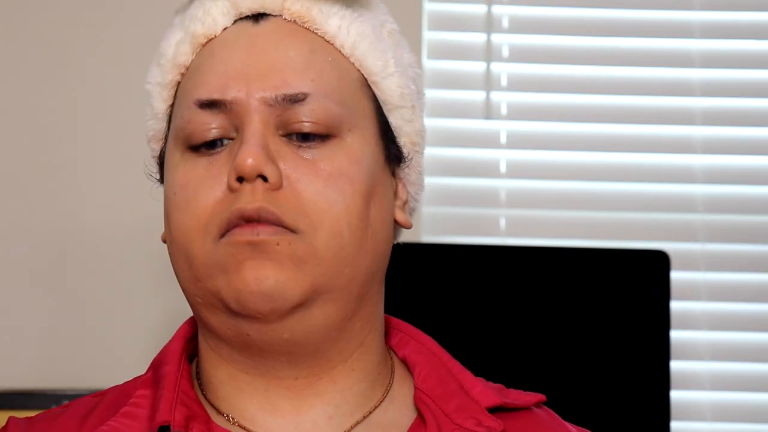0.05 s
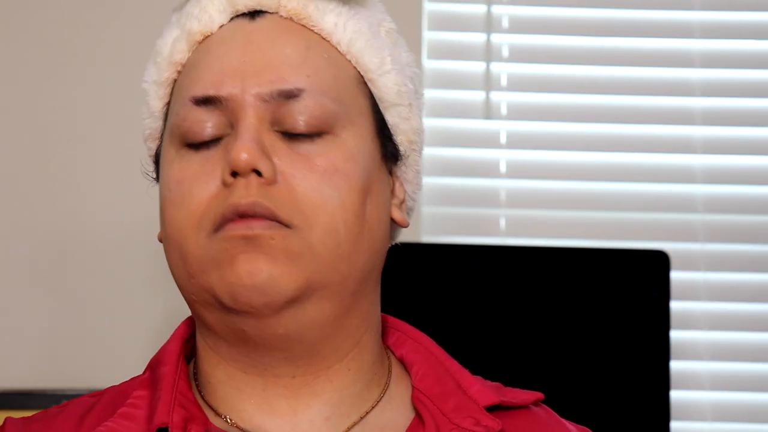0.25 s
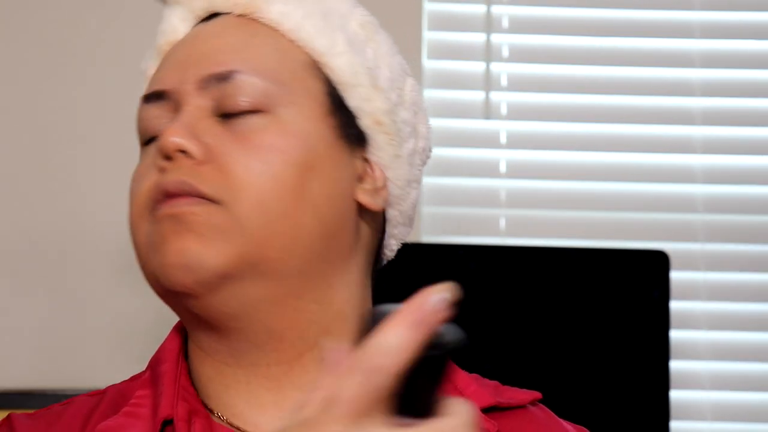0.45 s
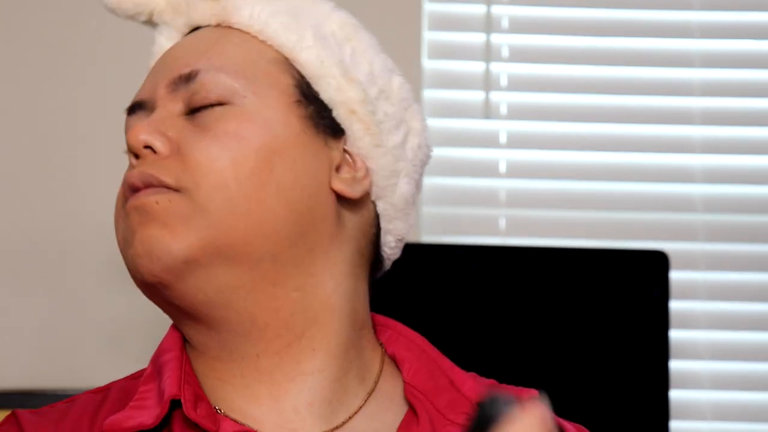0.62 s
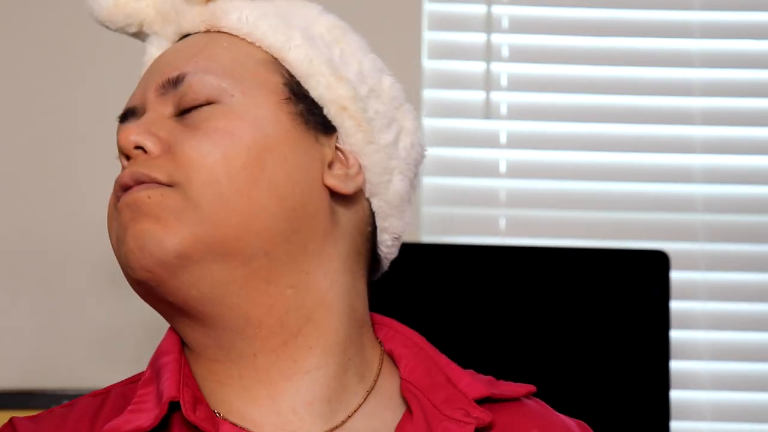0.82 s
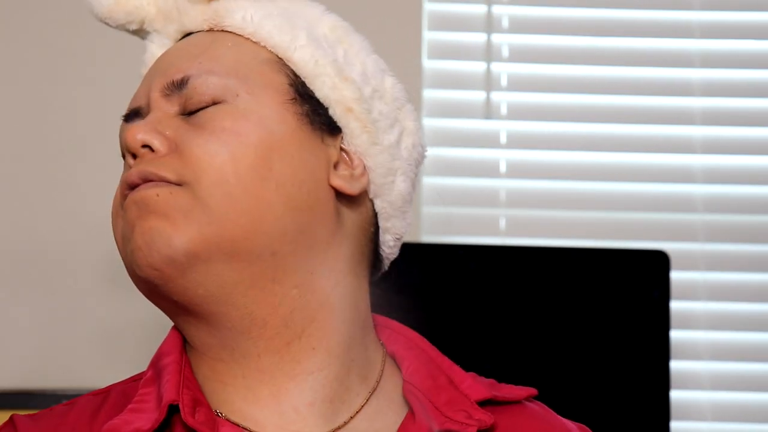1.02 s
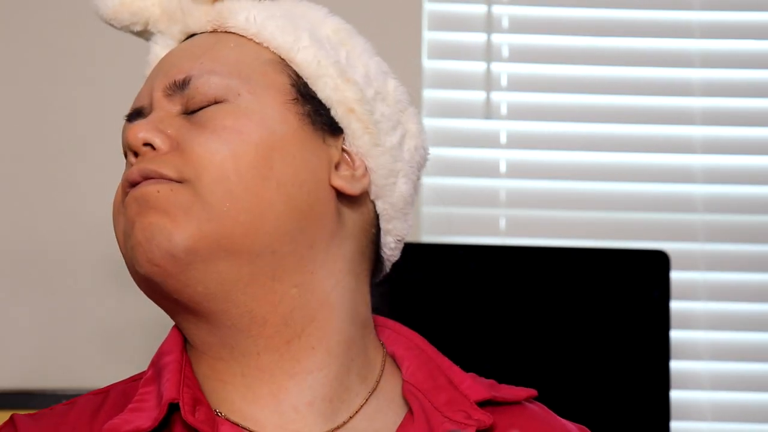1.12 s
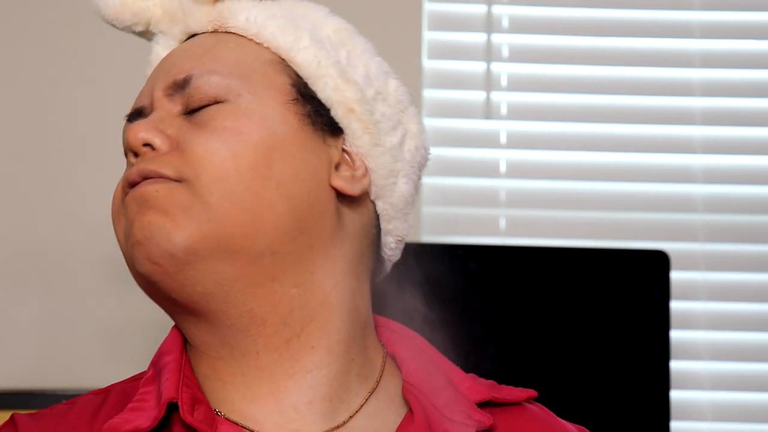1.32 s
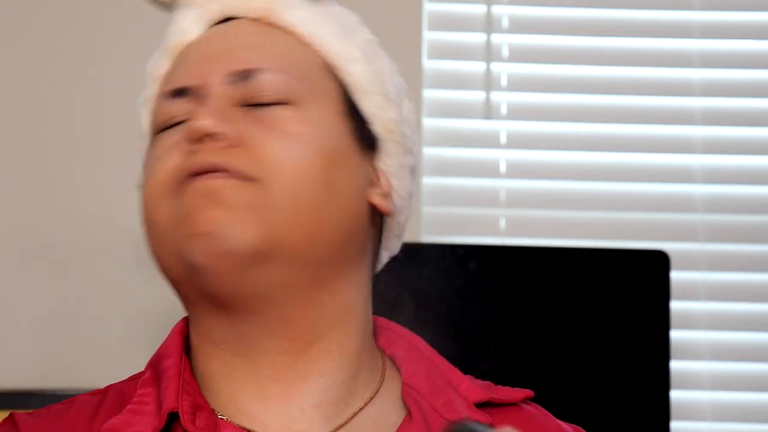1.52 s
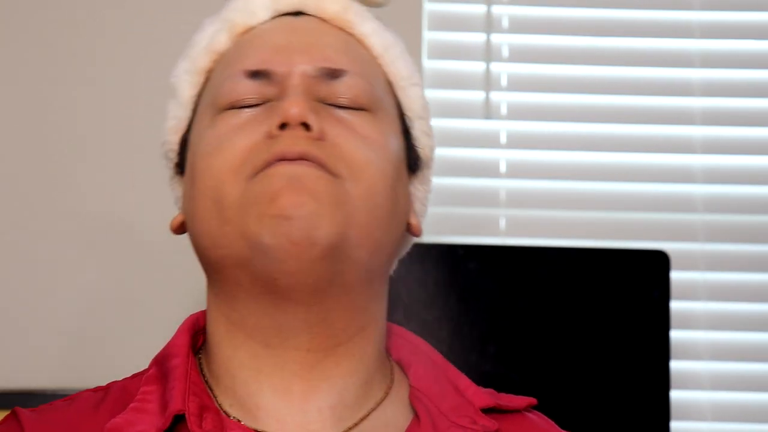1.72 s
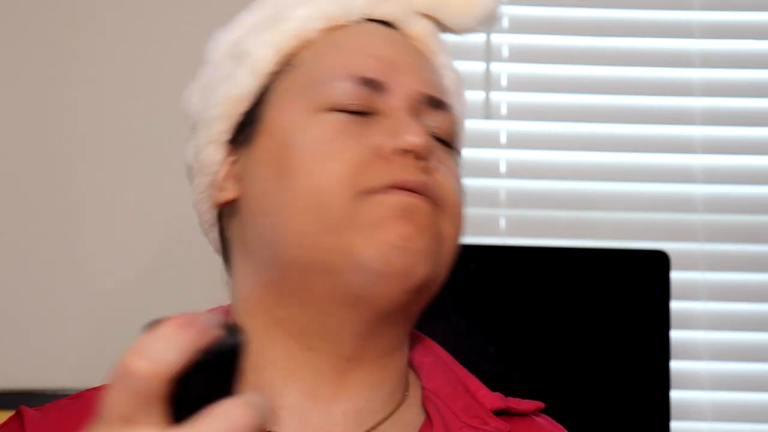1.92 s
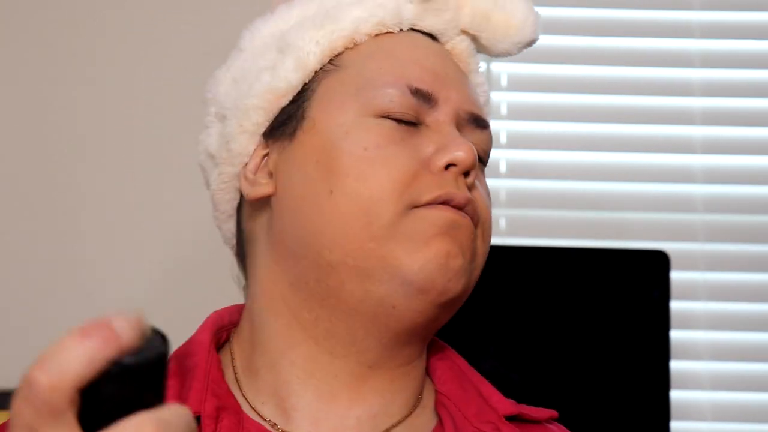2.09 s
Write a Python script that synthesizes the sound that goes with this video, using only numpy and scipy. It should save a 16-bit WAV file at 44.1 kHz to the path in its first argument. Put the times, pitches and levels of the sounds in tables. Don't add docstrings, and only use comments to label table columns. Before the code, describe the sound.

Quick spritzes from a small plastic pump bottle, with a loud cap pop first, indoors

```python
import sys
import numpy as np
from scipy import signal
from scipy.fft import rfft, irfft, next_fast_len
from scipy.io import wavfile
from scipy.ndimage import uniform_filter1d, map_coordinates

SR = 44100
rng = np.random.default_rng(int(sys.argv[2]) if len(sys.argv) > 2 else 0)


def unload_audio(sound):
    columns = np.transpose(np.atleast_2d(sound))
    steps = np.round(np.clip(columns, -1, 1) * 32767)
    wavfile.write(sys.argv[1], SR, steps.astype(np.int16))


def magnitude_from_level(level_db):
    exponent = np.asarray(level_db, float) / 20
    return 10 ** exponent


N = 94815

ROOM_DB, MIST_WET_DB = -0.5, -4.5


def unit(x):
    return x / np.sqrt(np.mean(x ** 2) + 1e-20)


def along(points, hz):
    f, v = np.transpose(points)
    return np.interp(np.log(hz + 1), np.log(f + 1), v)


def filtered(x, response):
    m = next_fast_len(x.shape[-1] + 4096)
    spectrum = rfft(x, m) * response(np.fft.rfftfreq(m, 1 / SR))
    return irfft(spectrum, m)[..., :x.shape[-1]]


def peaks(modes):
    def response(f):
        total = 0
        for k, (centre, width, db) in enumerate(modes):
            damping = 1j * f * width
            total = total + (-1) ** k * magnitude_from_level(db) * damping / (centre * centre - f * f + damping)
        return total
    return response


def wobble(rate):
    knots = rng.standard_normal(int(N * rate / SR) + 4)
    return map_coordinates(knots, [np.arange(N) * rate / SR])


def swell(t, rise, fall):
    return np.exp(-(t / np.where(t < 0, rise, fall)) ** 2)


def cycles(hz, t):
    turn = np.cumsum(hz) / SR
    return turn - np.interp(0, t, turn)


def spread(pair, spectrum, alike):
    def mix(hz):
        angle = np.arccos(np.clip(along(alike, hz), -1, 1)) / 2
        return magnitude_from_level(along(spectrum, hz)) * [np.cos(angle), np.sin(angle)]
    mid, side = filtered(pair, mix)
    return unit(np.array([mid + side, mid - side]))


def heard(x, wet_db):
    # (delay [s], left [dB], right [dB], dull above [Hz])
    reflections = [(.0046, -8, -8, 1800), (.0066, -9.5, -8.5, 30000), (.012, -20, -18, 5000),
                   (.017, -19, -21, 5000), (.024, -20, -20, 5000)]
    # (frequency [Hz], T60 [s])
    decay_times = [(300, 0.36), (1000, 0.26), (3000, 0.31), (8000, 0.4), (15000, 0.37)]
    lag_s, lag_fades_hz, right_db = 4.5e-5, 6000, 1.1

    hz, t, z = signal.stft(rng.standard_normal((2, SR // 2)), SR, nperseg=256)
    decay = magnitude_from_level(-60 * t / along(decay_times, hz)[:, None])
    tail = signal.istft(z * decay, SR, nperseg=256)[1]
    tail += filtered(tail[::-1], lambda f: 0.45 / (1 + (f / 2500) ** 2))
    build_up = np.clip(np.arange(tail.shape[1]) / SR / 0.0061, 0, 1)
    tail *= magnitude_from_level(wet_db) / np.linalg.norm(tail[0]) * build_up

    def near_field(f):
        lag = np.array([[lag_s], [0]]) / np.hypot(1, f / lag_fades_hz)
        paths = magnitude_from_level([[-right_db / 2], [right_db / 2]])
        for delay, left_db, right_echo_db, dull_hz in reflections:
            absorbed = np.exp(-2j * np.pi * f * delay) / (1 + 1j * f / dull_hz) ** 2
            paths = paths + magnitude_from_level([[left_db], [right_echo_db]]) * absorbed
        return np.exp(-2j * np.pi * f * lag) * paths

    x = np.pad(x, (0, tail.shape[1]))
    return filtered(x, near_field) + signal.fftconvolve(x[None], tail, axes=1)[:, :len(x)]


def add(out, x, s):
    out[:, round(s * SR):][:, :x.shape[1]] += x


def knocks(out):
    # (time [s], peak [dB], thud pitch [Hz], crack over thud [dB])
    press_knocks = [
        (.6142, -37.5, 1070, -23),
        (0.722, -36, 1600, -4),
        (0.915, -31, 1000, -5),
        (1.5356, -44, 900, -1),
        (1.8271, -32.5, 890, -4),
        (1.931, -35, 694, -23),
        (0.918, -17, 800, -7.5),
        (1.2002, -15.5, 916, -6),
        (1.5446, -15, 864, -12),
        (1.8343, -16.5, 815, -15),
    ]
    bottom_knocks = [
        (.9478, -16.5, 704, -11.5),
        (1.2376, -20.5, 674, -6),
        (1.5798, -19, 694, -21),
        (1.869, -20.5, 700, -8.5),
    ]
    release_knocks = [
        (0.6893, -28, 645, -15.5),
        (0.7525, -24, 686, -10),
        (1.0048, -20.5, 756, -0.5),
        (1.3121, -28.5, 700, -11),
        (1.3158, -23.5, 640, 1.5),
        (1.6293, -23.5, 600, 1.5),
        (1.9487, -21.5, 544, 1),
    ]
    # (rise [s], fall [s], pitch excess at the strike [ratio], hollow note [dB])
    knock_kinds = [
        (0.00044, 0.00079, 0.14, -26),
        (.0011, 0.0017, 0.023, -18.5),
        (.00045, 0.002, 1, -6.5),
    ]
    # (frequency [Hz], width [Hz], level [dB])
    shell_modes = [(1620, 1300, -30), (1940, 170, -26), (2720, 1550, 18.5), (4640, 280, -26),
                   (7200, 2200, 15), (9300, 650, 13.5), (11700, 6300, -32)]
    glide_s = 0.00019
    hollow_hz, hollow_t60_s, sag_per_s = 640, 0.027, 0.55
    crack_t60_s, crack_db, crack_rough = .004, 6, .25

    t = np.arange(SR // 10) / SR - .005
    shell = peaks(shell_modes)
    for rows, kind in zip((press_knocks, bottom_knocks, release_knocks), knock_kinds):
        rise, fall, excess, hollow_db = kind
        for s, db, hz, crack_over_db in rows:
            pitch = hz * (1 + 2 * excess / (1 + np.exp(t / glide_s)))
            thud = np.sin(2 * np.pi * cycles(pitch, t)) * swell(t, rise, fall)
            hollow = np.sin(2 * np.pi * hollow_hz * (t - sag_per_s * t * t)) * (t > 0)
            hollow *= magnitude_from_level(hollow_db - 60 * t / hollow_t60_s)
            contact = magnitude_from_level(-60 * (t + rise) / crack_t60_s) * (t > -rise)
            blow = crack_rough * rng.standard_normal(len(t)) * contact
            blow[np.argmax(t > -rise)] = -1
            crack = filtered(blow, lambda f: shell(f) / (1 + 1j * f / 11000) ** 2)
            crack *= magnitude_from_level(crack_over_db + crack_db) / abs(crack).max()
            add(out, heard(magnitude_from_level(db) * (thud + hollow + crack), ROOM_DB), s + t[0])


def spits(out):
    # (time [s], peak [dB])
    spit_times = [
        (.8928, -34),
        (.937, -32),
        (1.1774, -25),
        (1.19, -29),
        (1.2435, -27),
        (1.3335, -25),
        (1.352, -28),
        (1.8775, -25),
        (2.0105, -28),
        (2.0445, -28),
    ]
    # (frequency [Hz], width [Hz], level [dB])
    nozzle_modes = [(4000, 1500, -11), (7000, 1500, 0), (11000, 3000, -16)]
    t60_s = 0.0037

    t = np.arange(SR // 10) / SR - .005
    for s, db in spit_times:
        burst = rng.standard_normal(len(t)) * magnitude_from_level(-60 * t / t60_s) * (t > 0)
        spit = filtered(burst, peaks(nozzle_modes))
        add(out, heard(magnitude_from_level(db) * spit / abs(spit).max(), MIST_WET_DB), s + t[0])


def mist():
    # (peak time [s], level [dB], rise [s], fall [s])
    jet_times = [(.748, -53, 0.044, 0.013), (0.949, -45, .025, 0.015), (1.016, -41.5, 0.0094, 0.01),
                 (1.073, -41, 0.042, 0.061), (1.195, -45.5, 0.033, 0.039), (1.244, -41.5, 0.0093, 0.01),
                 (1.345, -47, .012, 0.043), (1.405, -35.5, 0.065, 0.056), (1.587, -44, 0.027, 0.016),
                 (1.66, -49, 0.034, 0.045), (1.718, -36.5, 0.058, .05), (1.873, -39, 0.014, 0.015),
                 (1.97, -49, 0.025, 0.054), (2.043, -37.5, .05, 0.052)]
    # (frequency [Hz], level [dB])
    mist_colour = [(500, -20), (1200, -6.5), (2000, -3), (3080, 1), (7080, 0), (10400, -1), (14000, -10),
                   (16500, -11)]
    # (frequency [Hz], coherence [ratio])
    mist_likeness = [(1000, 0.83), (3000, 0.83), (7000, 0.68), (15000, 0.29)]
    drops_per_s, drops_db, drop_hz = 690, -12.5, 7000

    t = np.arange(N) / SR
    power = sum((magnitude_from_level(db) * swell(t - s, rise, fall)) ** 2 for s, db, rise, fall in jet_times)
    flow = np.sqrt(power)

    z = signal.stft(rng.standard_normal((2, N)), nperseg=256)[2]
    patches = rng.standard_normal(z.shape[1:])
    patches = uniform_filter1d(uniform_filter1d(patches, 5, 0), 4, 1)
    hiss = signal.istft(z * magnitude_from_level(2 * unit(patches)), nperseg=256)[1][:, :N]

    chance = rng.random((3, N))
    drops = (chance[0] < drops_per_s / SR) * (chance[1] + 0.045) ** -.4 * np.sign(chance[2] - .5)
    drops = unit(filtered(drops, peaks([(drop_hz, 5000, 0)])))
    hiss = unit(hiss) + magnitude_from_level(drops_db) * drops * [[1], [.6]]

    flutter = magnitude_from_level(2.5 * wobble(97) + 0.39 * wobble(24.8))
    jet = spread(hiss * flow * flutter, mist_colour, mist_likeness) * np.sqrt(np.mean(flow ** 2))
    tail = rng.standard_normal((2, SR // 3)) * magnitude_from_level(-60 * np.arange(SR // 3) / SR / .22)
    tail /= np.linalg.norm(tail[0])
    wet = signal.fftconvolve(jet, tail, axes=1)[:, :N]
    return jet * magnitude_from_level([[-.3], [.3]]) + magnitude_from_level(MIST_WET_DB) * wet


def cap(out):
    # (frequency [Hz], level [dB])
    burst_colour = [(200, -21), (450, -8), (800, 6), (2000, -32), (4500, -6), (9500, -5.5), (12000, -14.5),
                    (16500, -27)]
    pop_s, pop_db, wet_db = .1504, -5.1, -1.5
    from_hz, to_hz, sweep_s = 1300, 4400, .003
    under_hz, under_db, air_db = 1160, -9, -15

    t = np.arange(SR // 20) / SR - .01
    hz = from_hz + (to_hz - from_hz) / (1 + np.exp(-(t + .0006) / sweep_s * 4))
    pop = np.cos(2 * np.pi * cycles(hz, t)) * swell(t, .001, .001)
    under = np.cos(2 * np.pi * under_hz * t) * swell(t + .0008, .0017, .002)
    under += .8 * np.cos(2 * np.pi * 1.36 * under_hz * t) * swell(t, .0014, .0018)
    air = unit(filtered(rng.standard_normal(len(t)), lambda f: magnitude_from_level(along(burst_colour, f))))
    air *= swell(t, .0022, .003)
    release = magnitude_from_level(air_db) * air - pop - magnitude_from_level(under_db) * under
    add(out, heard(magnitude_from_level(pop_db) * release, ROOM_DB + wet_db), pop_s + t[0])


def room_tone():
    # (frequency [Hz], level [dB])
    air_colour = [(15, -39), (25, -8.5), (266, -7.5), (321, -11.5), (410, -10.5), (470, -11), (6550, -26),
                  (14800, -35.5), (16500, -51)]
    # (frequency [Hz], coherence [ratio])
    air_likeness = [(60, 0.69), (240, 0.76), (950, 0.22), (3770, 0.03), (15000, 0.24)]
    # (frequency [Hz], rms level [dB])
    hum_lines = [(33, -60.5), (60, -64), (120, -66.5)]

    t = np.arange(N) / SR
    hum = 0
    for hz, db in hum_lines:
        level = np.sqrt(2) * magnitude_from_level(db + 0.95 * wobble(8))
        hum = hum + level * np.sin(2 * np.pi * hz * t + 0.73 * wobble(5.3))
    air = spread(rng.standard_normal((2, N)), air_colour, air_likeness)
    return magnitude_from_level(-52 + 0.77 * wobble(5.6)) * air + hum


def scene():
    out = np.zeros((2, N + SR))
    knocks(out)
    spits(out)
    cap(out)
    return out[:, :N] + mist() + room_tone()


def roll_off(x):
    return signal.sosfilt(signal.butter(12, 16630, fs=SR, output="sos"), x)


def record(dry):
    mix = filtered(dry, lambda f: magnitude_from_level(-32 * (f > 15750)))
    return roll_off(mix)


dry = scene()
out = record(dry)
unload_audio(out)
```